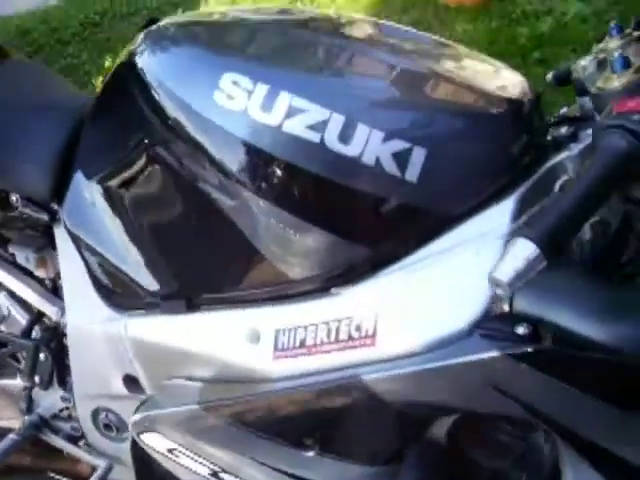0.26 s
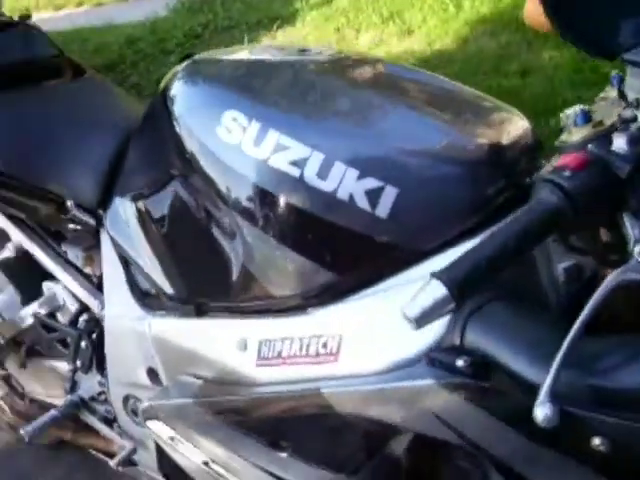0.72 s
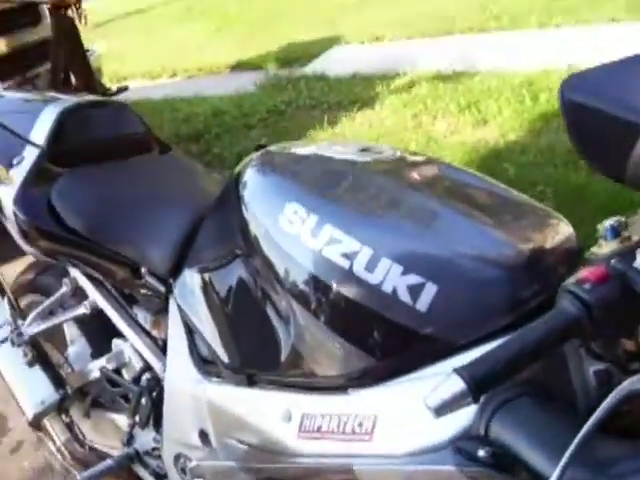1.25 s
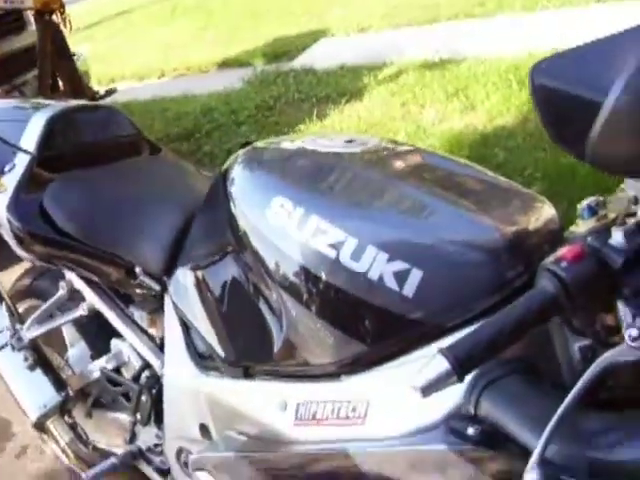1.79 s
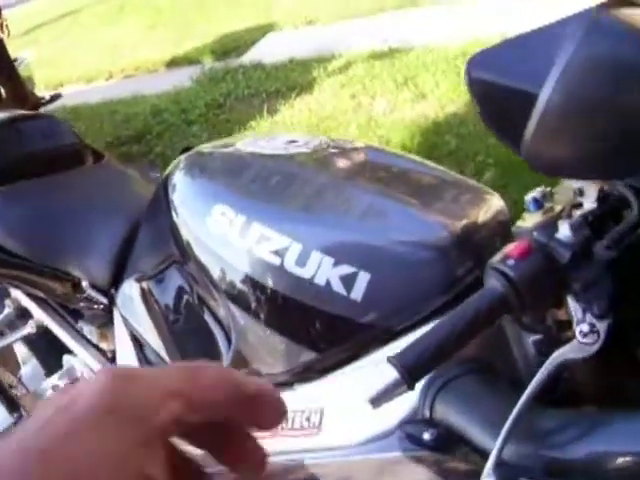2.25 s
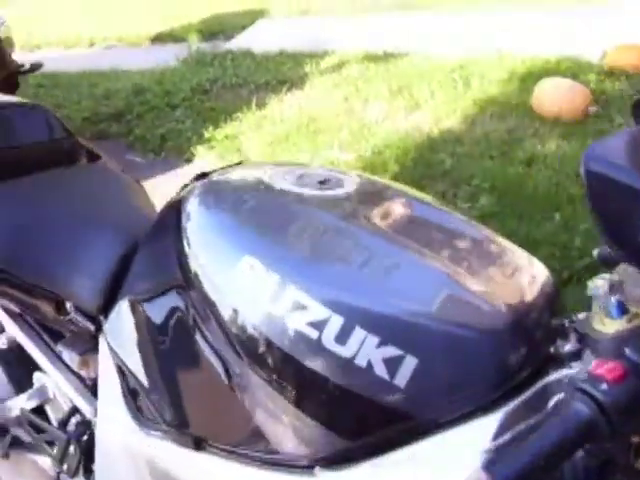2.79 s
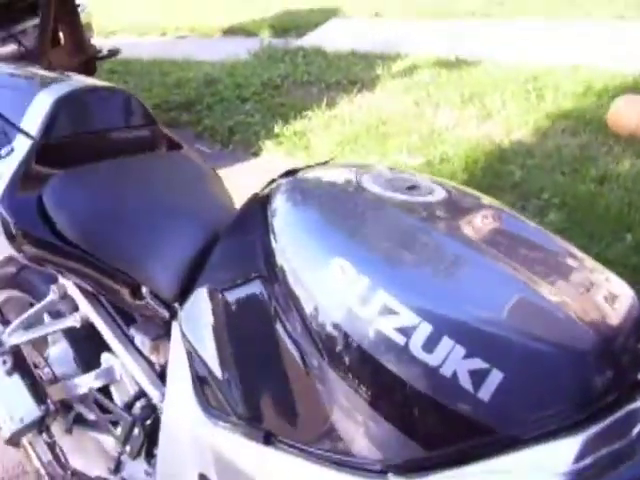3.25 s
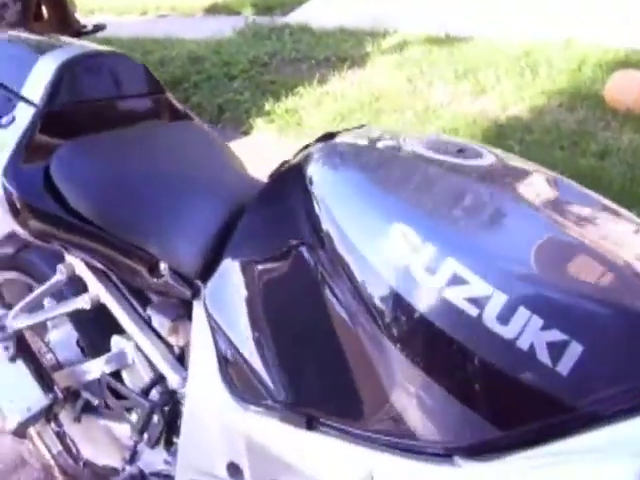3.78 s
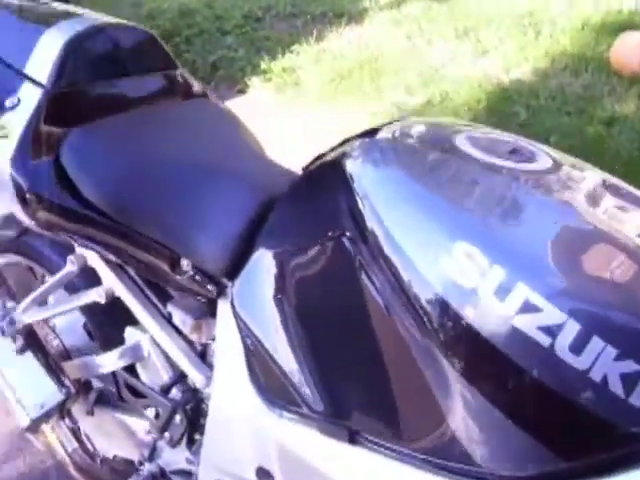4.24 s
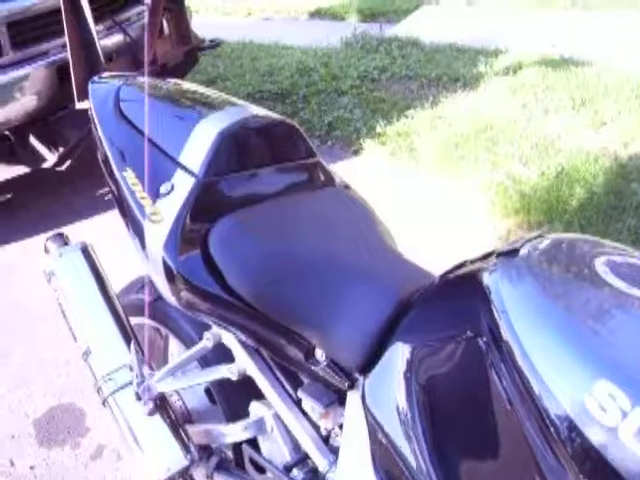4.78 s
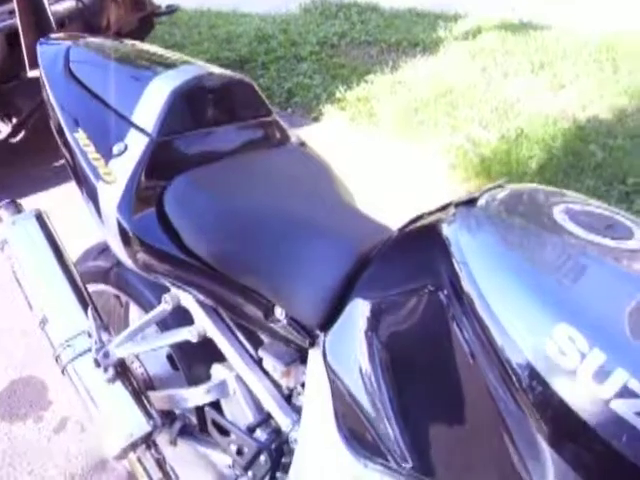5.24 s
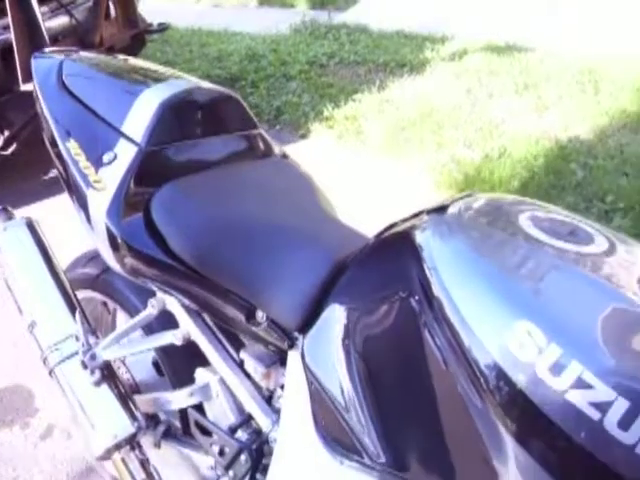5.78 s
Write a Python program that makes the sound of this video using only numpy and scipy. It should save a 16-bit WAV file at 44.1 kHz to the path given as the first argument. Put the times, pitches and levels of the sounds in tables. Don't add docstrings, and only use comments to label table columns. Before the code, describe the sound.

A four-cylinder motorcycle idles unevenly up close, throaty exhaust throbbing over metallic clatter and a wavering gear whine, with crackly overload on a cheap microphone.

```python
import sys
import numpy as np
from scipy import signal
from scipy.fft import rfft, irfft, next_fast_len
from scipy.io import wavfile
from scipy.ndimage import uniform_filter1d

SR = 44100
rng = np.random.default_rng(int(sys.argv[2]) if len(sys.argv) > 2 else 0)


def output_pcm(signal):
    pcm = np.clip(np.atleast_2d(signal).T, -1, 1) * 32767
    wavfile.write(sys.argv[1], SR, np.round(pcm).astype(np.int16))


def gain_from_db(level_db):
    decades = np.asarray(level_db, float) / 20
    return 10 ** decades


N = 265923
T = np.arange(N) / SR

# (time [s], clatter level after the step [dB])
GAIN_STEPS = [
    (0, -22.5),
    (0.589, -26.5),
    (1.491, -27),
    (2.272, -26.5),
    (2.31, -29),
    (2.335, -33.5),
    (4.314, -25.5),
    (5.042, -27),
    (5.937, -28),
]
# (time [s], depth [dB], half width [s])
GAIN_DIPS = [(0.883, 6.5, .015), (2.35, 2.5, .015), (3.344, 7.5, .008), (4.534, 11.5, 0.017)]
# (time [s], length [s], first tick level [dB], last tick level [dB])
OVERLOAD_BURSTS = [(.2256, .0209, -30, -34), (0.289, .0236, -27, -48), (.384, .0182, -28.5, -25),
                   (.4088, .0385, -26.5, -32), (.4534, .0146, -32.5, -25.5), (0.5117, .0701, -27, -29),
                   (1.1922, .0185, -37, -35.5), (1.2532, .0232, -31.5, -23.5), (1.3035, .0207, -25, -37.5),
                   (1.365, .0235, -27, -30), (1.439, .0175, -42, -33.5), (2.0536, .0236, -31.5, -27.5),
                   (2.102, .0406, -30.5, -22.5), (2.2345, 0.022, -25, -33.5), (3.581, .0208, -41, -38),
                   (3.6862, 0.01, -36, -38), (3.7876, .0124, -33.5, -44), (3.8787, .0063, -25, -28.5),
                   (3.9335, .0226, -25, -25), (3.975, .0257, -25.5, -36), (4.06, .0294, -27, -21),
                   (4.108, .0239, -25, -20), (4.179, .0197, -28.5, -29), (4.261, .0514, -26, -19.5),
                   (4.831, .0922, -32.5, -26.5), (4.994, .0222, -26, -27), (5.5754, .0182, -36.5, -27.5),
                   (5.7506, .0446, -31.5, -23), (5.8384, .0491, -29.5, -27.5), (5.903, .0308, -19.5, -23)]
# (frequency [Hz], level [dB])
MICROPHONE = [(20, -27.5), (40, 6), (70, 5.5), (3500, 0), (3800, -6.5), (4100, -20), (4500, -28),
              (6000, -60.5)]
# (frequency [Hz], level [dB])
CONVERTER = [(15, -0.5), (40, -2.5), (4000, -0.5), (4400, -7.5), (4650, -28.5), (4800, -84.5), (5200, -110)]
# (time [s], pitch [Hz], level [dB])
PANEL_HUM = [
    (5.87, 643, -29.5),
    (5.886, 647, -20),
    (5.936, 631.5, -25.5),
    (5.948, 653, -44.5),
    (5.966, 635, -22.5),
    (6.03, 622, -21),
]
# (pitch as a multiple of the firing rate [count], level [dB])
GEAR_MESH = [(72, 0), (67.5, -11), (76.5, -12), (47, -17), (23, -10)]
# (frequency [Hz], level [dB])
WHINE_COVER = [(2600, -14.5), (2950, 3), (3100, 0.5), (3230, -4), (3370, 1), (3450, -3.5), (3700, -0.5)]
# (frequency [Hz], level [dB per Hz])
CLATTER_SPECTRUM = [(25, -16), (60, 1), (140, -10.5), (200, 7), (400, -1), (600, 5), (1200, -3), (1700, -2),
                    (2400, 1.5), (3000, 3.5), (3600, -1.5), (5000, 1)]
# (frequency [Hz], width [Hz], level [dB])
COVER_MODES = [(885, 97, 1.5), (796, 72, 2), (983, 20, -6), (698, 140, -8)]
# (frequency [Hz], width [Hz], level [dB])
FIN_MODES = [(1333, 66, -6), (1386, 240, -1), (2035, 37, -0.5), (2217, 30, -3), (2427, 28, 3.5)]
# (frequency [Hz], width [Hz], level [dB])
PIPE_MODES = [(303, 82, 0.5), (246, 15, -4.5), (321, 23, 2.5), (468, 31, -3.5)]
# (frequency [Hz], width [Hz], level [dB])
CAN_MODES = [(93.4, 31, 2.5), (46.7, 7.4, -19.5)]
# (time [s], pipe mode above bark [dB],
# clutch cover mode above covers [dB], covers above clatter [dB], whine above clatter [dB])
VIEWPOINT = [(0, -2, -10, -0.5, 3.5), (.6, -9, -1, 3.5, 2), (1.1, -7, 1, 3, -0.5),
             (1.5, -5.5, -1, 1.5, 2.5), (1.8, -16.5, -5, 2, 6), (2.3, -15, -12.5, 4, 7),
             (3.5, -14.5, -20.5, 3.5, 3.5), (3.7, -10, 5.5, 2.5, 5), (4.3, -4, 5, 0, 1),
             (4.6, -4.5, -4.5, 2, 3.5), (5.3, -5, -8.5, 4.5, 3), (5.75, -5.5, -6, 5, 4),
             (6.03, -5, 3, 3, 4)]
# (time [s], mean firing rate [1/s], burn strength [dB], strong-weak swing [dB])
LOPE = [(-.09, 43.4, -2, 0), (.285, 42.8, 0.5, 0), (.62, 44.3, 3, 2.5), (.995, 43.5, 3.5, 1.5),
        (1.36, 45.7, 3.5, 0), (1.74, 42.4, 3, 1.5), (2.12, 45.3, 4, 3.5), (2.46, 46.6, 2, 5),
        (2.82, 45, 3.5, 4), (3.175, 47.2, 4, 3.5), (3.56, 42.5, 4.5, 2.5), (3.955, 44, 1, 1.5),
        (4.34, 43.8, -1.5, 1), (4.72, 43.7, -0.5, -0.8), (5.07, 44.5, 1.5, 2.5), (5.42, 43.2, 3, 2.5),
        (5.79, 45, 2, 3), (6.16, 42.6, 3, 4.5)]


def evened(x):
    return x / np.sqrt(np.mean(x ** 2) + 1e-20)


def curve(rows, column):
    rows = np.array(rows)
    return np.interp(T, rows[:, 0], rows[:, column])


def read(points, hz):
    f, db = np.transpose(points)
    return np.interp(np.log(hz + 1), np.log(f + 1), db)


def colour(x, points):
    size = next_fast_len(N + 4096)
    gain = gain_from_db(read(points, np.fft.rfftfreq(size, 1 / SR)))
    return irfft(rfft(x, size) * gain, size)[:N]


def resonate(x, hz, width):
    carrier = np.exp(2j * np.pi * np.cumsum(hz * np.ones(N)) / SR)
    decay = np.exp(-np.pi * width / SR)
    smoothed = signal.lfilter([1 - decay], [1, -decay], x / carrier)
    return 2 * (carrier * smoothed).real


def body(x, modes):
    return evened(sum(gain_from_db(db) * evened(resonate(x, hz, width)) for hz, width, db in modes))


def firings(turns, spread_db, early):
    count = np.floor(turns + early).astype(int)
    size = gain_from_db(spread_db * rng.standard_normal(400))[count]
    return size * (np.diff(count, prepend=count[0]) > 0)


def puffs(turns, depth, sharp):
    swell = np.exp(sharp * (np.cos(2 * np.pi * turns) - 1))
    return (1 + depth * swell) * rng.standard_normal(N)


def lope():
    burns = np.interp(T, [row[0] for row in LOPE], 2 * np.arange(len(LOPE)))
    return np.cos(2 * np.pi * burns)


def burn_db():
    return curve(LOPE, 2) + curve(LOPE, 3) * lope()


def crank():
    zigzag = np.arcsin(.97 * lope()) / np.arcsin(.97)
    drift = evened(uniform_filter1d(uniform_filter1d(rng.standard_normal(N), 1800), 1800))
    swing = 3.5 + .18 * curve(LOPE, 3)
    return curve(LOPE, 1) + swing * zigzag + .35 * drift


def camera_db():
    creep_db_per_s, step_s = 8, 0.0027
    s, db = np.transpose(GAIN_STEPS)
    last = np.maximum(np.searchsorted(s, T, side="right") - 1, 0)
    ramp = db[last] + creep_db_per_s * (T - s[last])
    dips = sum(depth_db * np.exp(-((T - at) / width) ** 2) for at, depth_db, width in GAIN_DIPS)
    return uniform_filter1d(ramp, round(step_s * SR)) - dips


def crackle(x):
    s, length, first_db, last_db = np.transpose(OVERLOAD_BURSTS)[:, :, None]
    place, weak = rng.random((len(OVERLOAD_BURSTS), 2, 5)).transpose(1, 0, 2)
    at = np.hstack([s, s + length, s + length * place])
    between_db = np.maximum(first_db, last_db) - 5 - 26 * weak
    db = np.hstack([first_db, last_db, between_db])
    train = np.zeros(N)
    train[np.round(at * SR).astype(int)] = gain_from_db(db + 8.0)
    cap = np.exp(-(np.arange(-8, 9) / 1.41) ** 2)
    return x - np.convolve(train * np.sign(x), cap, "same")


def panel():
    turns = np.cumsum(curve(PANEL_HUM, 1)) / SR
    neighbour = .4 * np.sin(2 * np.pi * 1.155 * turns)
    tone = np.sqrt(2) * (np.sin(2 * np.pi * turns) + neighbour)
    onset = np.clip((T - PANEL_HUM[0][0]) / 0.022, 0, 1)
    return gain_from_db(curve(PANEL_HUM, 2) + 2.5) * tone * onset


def whine(speed, turns):
    kick = .013 * np.sin(2 * np.pi * turns) + .005 * np.sin(np.pi * turns / 2)
    near_db = -3 + 11 * np.exp(-(T / 0.23) ** 2)
    out = np.zeros(N)
    for order, db in GEAR_MESH:
        hz = order * speed * (1 + kick)
        load = gain_from_db(3.1 * evened(uniform_filter1d(rng.standard_normal(N), 400)))
        rough = load * puffs(turns, depth=.4, sharp=1.2)
        fuzz = resonate(resonate(rough, hz, 110), hz, 260)
        cover_db = read(WHINE_COVER, hz) if order > 60 else near_db
        out = out + gain_from_db(db + cover_db) * evened(fuzz)
    return gain_from_db(curve(VIEWPOINT, 4) - 0.76) * evened(out)


def engine(turns):
    knocks = evened(firings(turns, spread_db=6.0, early=.05))
    clatter = colour(evened(puffs(turns, depth=1.0, sharp=13.0)) + 0.11 * knocks, CLATTER_SPECTRUM)
    clatter = clatter * gain_from_db(.15 * burn_db())
    midrange = signal.butter(4, [1250, 2600], "bandpass", fs=SR, output="sos")
    reference = signal.sosfilt(midrange, clatter).std()
    shake = puffs(turns, depth=0.09, sharp=1.5) + 0.28 * knocks
    clutch_cover = gain_from_db(curve(VIEWPOINT, 2) - 5.5) * evened(resonate(shake, 926.6, 32))
    covers = gain_from_db(curve(VIEWPOINT, 3) - 2.0) * (body(shake, COVER_MODES) + clutch_cover)
    fins = gain_from_db(-10.5) * body(clatter, FIN_MODES)
    return gain_from_db(-1.0) * clatter / reference + covers + fins


def exhaust(turns):
    ring_hz = 274
    blows = firings(turns, spread_db=2.0, early=0.061)
    echoed = evened(blows + .4 * np.roll(blows, round(SR / 91)))
    drive = echoed + .27 * puffs(turns, depth=1.2, sharp=1.2)
    bark = evened(resonate(body(drive, PIPE_MODES), 247, 260))
    ring = evened(resonate(resonate(drive, ring_hz, 18), ring_hz, 140))
    pumping = evened(blows) + .3 * rng.standard_normal(N)
    boom = body(resonate(pumping, 75, 70), CAN_MODES)
    burn = burn_db()
    pipe = gain_from_db(1.77 * burn - 6.0) * bark + gain_from_db(.55 * burn + curve(VIEWPOINT, 1)) * ring
    boom_db = -7 + 0.35 * curve(LOPE, 2) + 0.53 * curve(LOPE, 3) * lope()
    return pipe + gain_from_db(boom_db) * boom


def scene():
    speed = crank()
    turns = .5 + np.cumsum(speed) / SR
    bike = exhaust(turns) + engine(turns) + whine(speed, turns)
    return (gain_from_db(camera_db()) * bike + panel())[None]


def band_limit(x):
    return signal.sosfilt(signal.butter(12, 15890, fs=SR, output="sos"), x)


def record(dry):
    rail = .72
    heard = np.clip(colour(dry[0], MICROPHONE), -.65, .65)
    hiss = gain_from_db(-39) * rng.standard_normal(N)
    narrow = colour(heard + hiss, CONVERTER)
    mix = crackle(np.clip(narrow, -rail, rail))[None]
    return band_limit(mix)


dry = scene()
out = record(dry)
output_pcm(out)
```